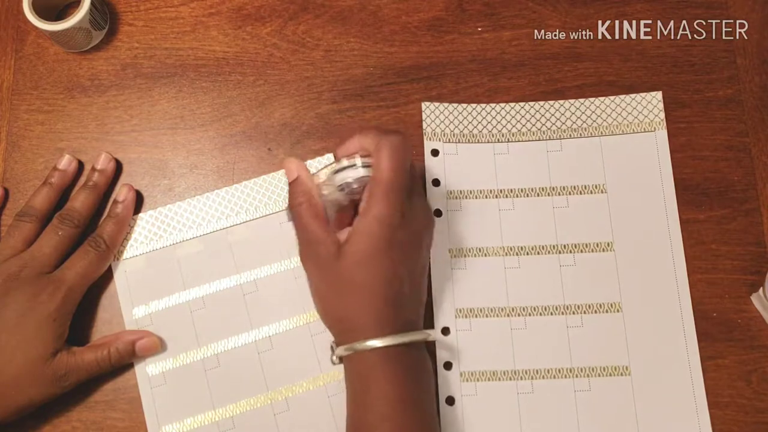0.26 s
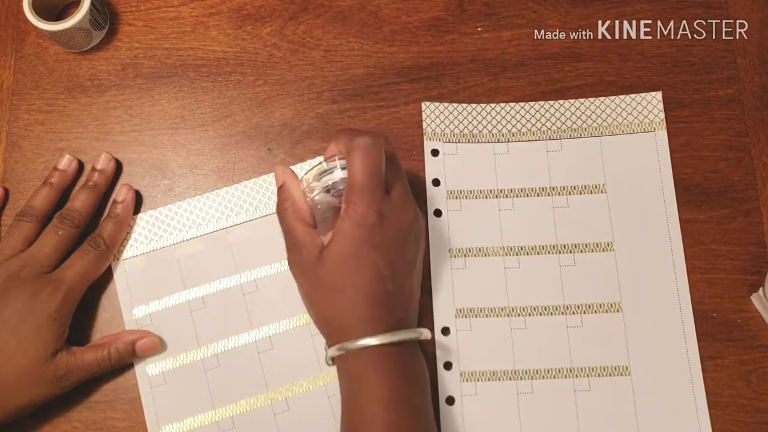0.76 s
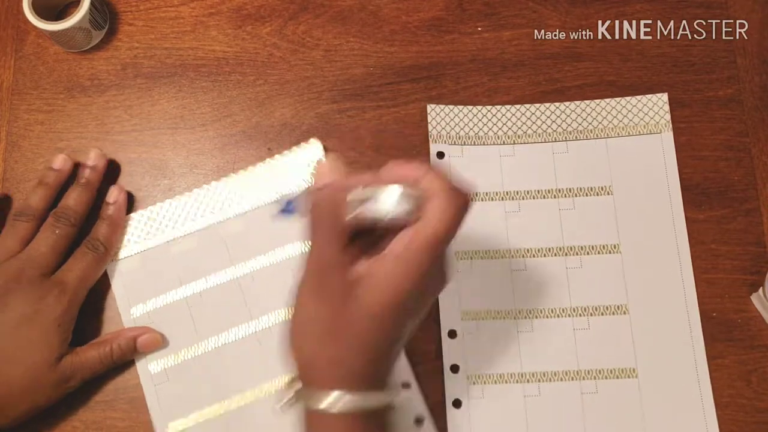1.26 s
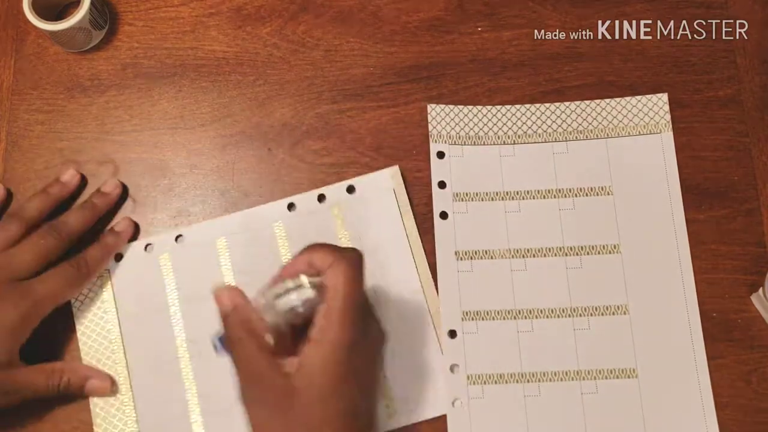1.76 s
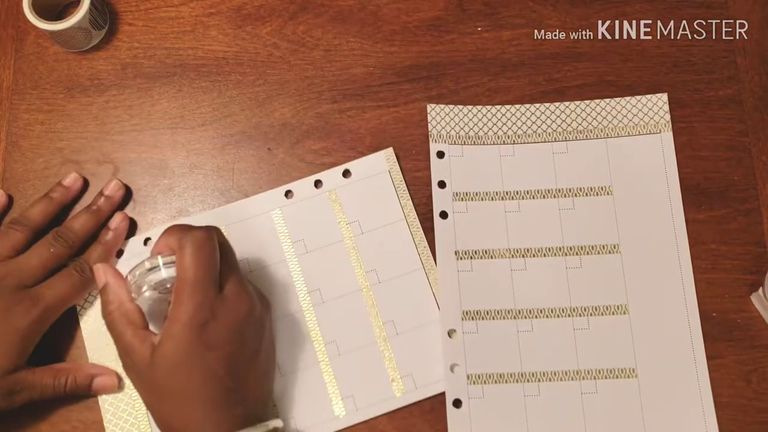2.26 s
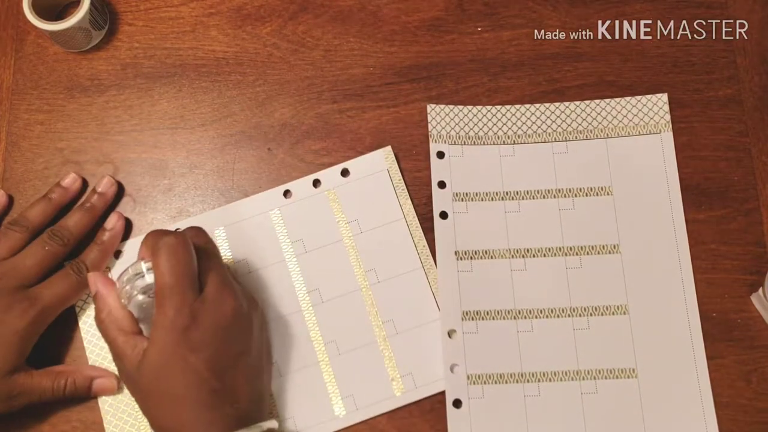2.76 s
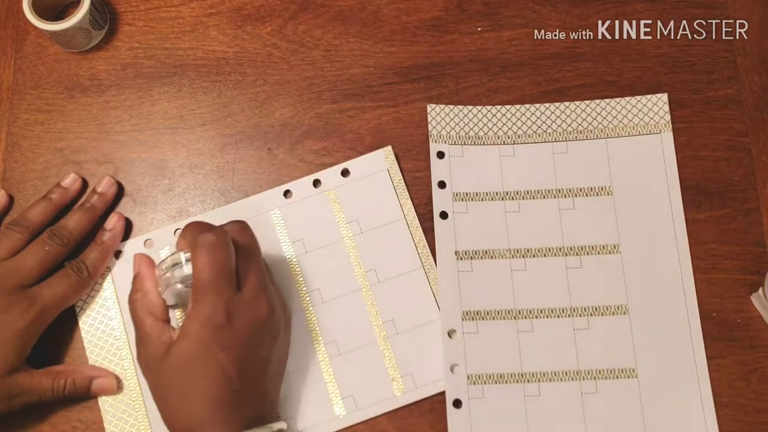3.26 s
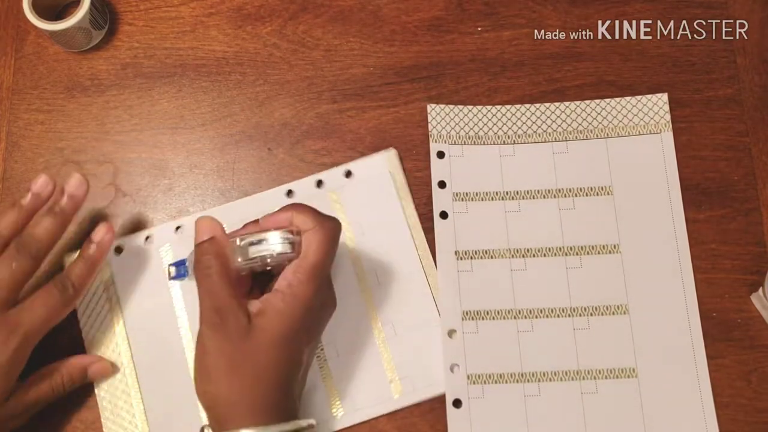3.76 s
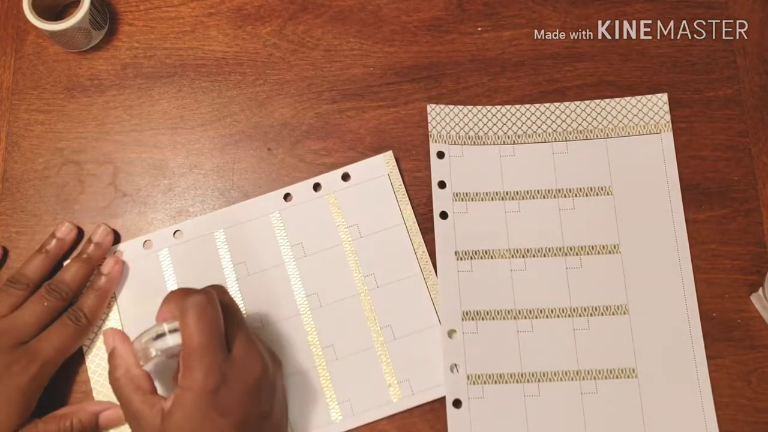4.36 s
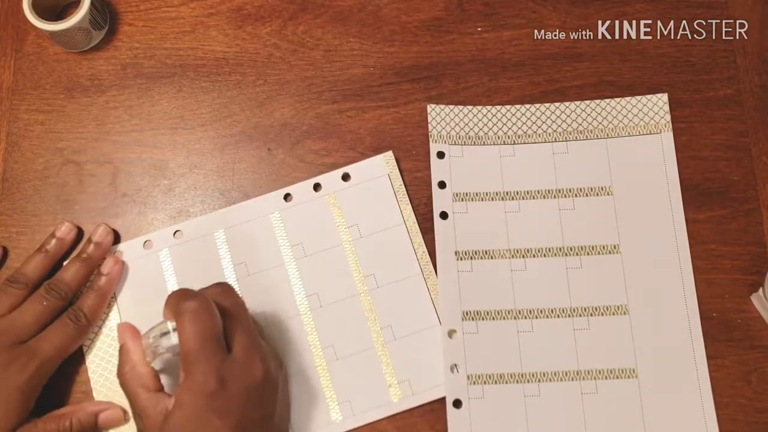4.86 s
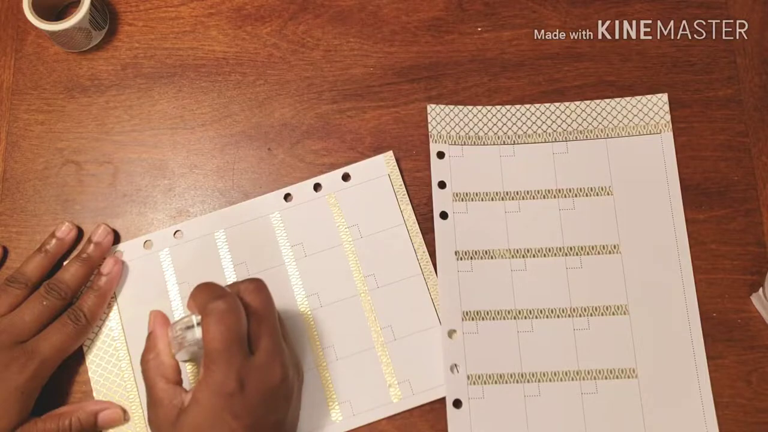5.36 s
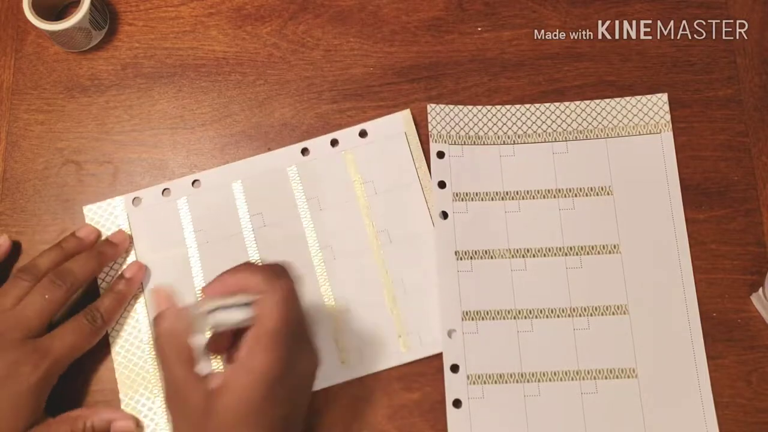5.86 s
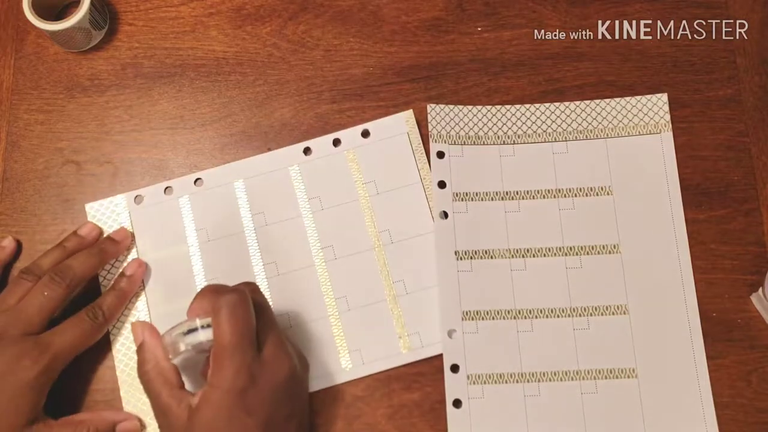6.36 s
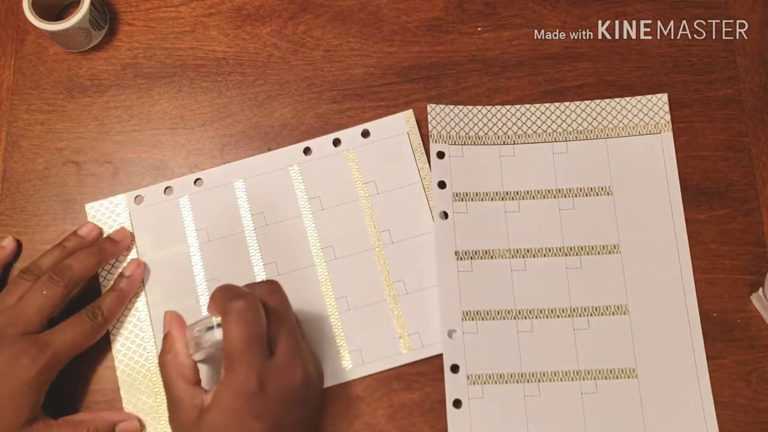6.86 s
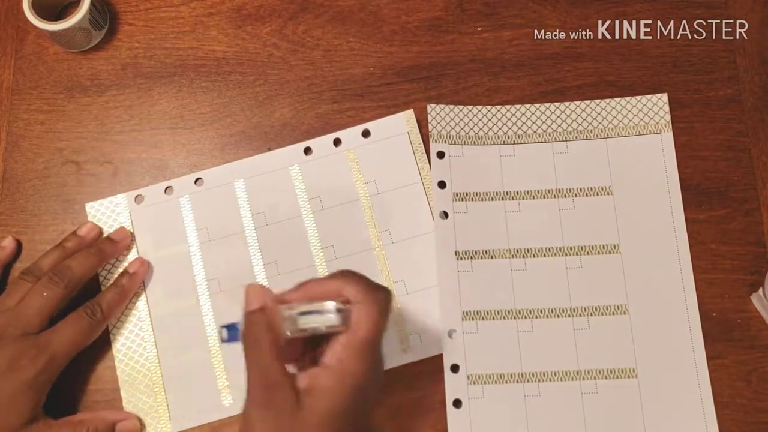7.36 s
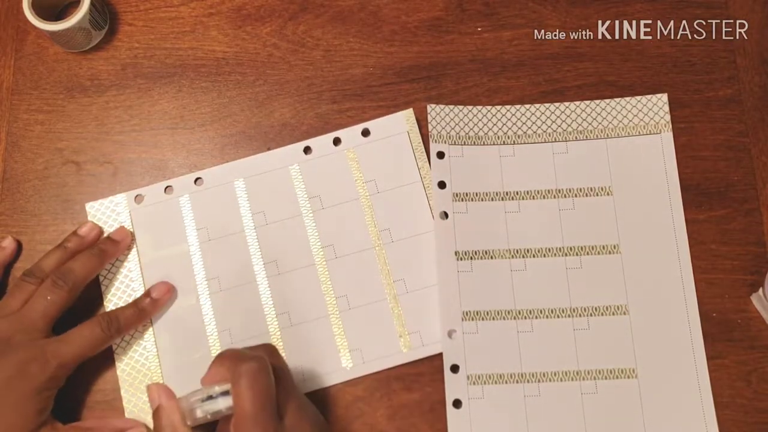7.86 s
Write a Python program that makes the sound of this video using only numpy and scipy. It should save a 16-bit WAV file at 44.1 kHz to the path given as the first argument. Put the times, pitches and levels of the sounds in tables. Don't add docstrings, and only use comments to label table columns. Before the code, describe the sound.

A correction-tape roller clicks in five dry ratcheting bursts over paper, with page scuffs, desk bumps and distant hollow knocks above a low hum.

```python
import sys
import numpy as np
from scipy import signal
from scipy.fft import rfft, irfft, next_fast_len
from scipy.io import wavfile
from scipy.ndimage import uniform_filter1d

SR = 44100
rng = np.random.default_rng(int(sys.argv[2]) if len(sys.argv) > 2 else 0)


def transcribe(u):
    v = np.clip(np.atleast_2d(u).T, -1, 1)
    q = np.round(v * 32767).astype(np.int16)
    wavfile.write(sys.argv[1], SR, q)


def volts(x):
    e = np.asarray(x, float) / 20
    return 10 ** e


N = 358091

# (start [s], end [s], whirr [Hz], whirr level [dB])
STROKES = [
    (0, 0.247, 2200, -92),
    (0.754, 1.147, 2190, -80.5),
    (2.819, 3.604, 3110, -74.5),
    (4.751, 5.548, 1980, -84),
    (6.686, 7.349, 2020, -93),
]
# (ringing at start [Hz], at end [Hz], rattle at start [dB], at end [dB])
GRIPS = [(7500, 5240, -0.5, -8), (7300, 7100, 0.5, -6.5), (6660, 8100, -3, -2.5), (7800, 7100, -0.5, -5.5),
         (7140, 7600, -3.5, -0.5)]
# (time [s], 138 Hz mode [dB], 68 Hz mode [dB], slap level [dB], slap pitch [Hz])
BUMPS = [(.19, -79, -48.5, -58.5, 370), (1.25, -51, -67, -60, 350), (1.305, -59, -57, -65, 300),
         (1.486, -53, -51, -42, 435), (1.768, -46.5, -43, -61, 280), (2.09, -71, -71, -63, 610),
         (3.69, -73, -61, -60.5, 305), (3.918, -44.5, -43, -67, 250), (4.87, -74, -70, -60, 260),
         (5.581, -75, -64, -62, 560), (5.889, -73, -49, -86, 300), (7.36, -59, -54, -55, 490),
         (7.562, -51, -68, -67, 302), (7.662, -60, -46, -63, 230)]


def level(x, db):
    return x * volts(db) / np.sqrt(np.mean(x ** 2))


def shape(table, hz):
    f, value = np.transpose(table)
    return np.interp(np.log(hz + 1), np.log(f), value)


def colour(x, table):
    n = next_fast_len(x.shape[-1], True)
    gain = volts(shape(table, np.fft.rfftfreq(n, 1 / SR)))
    return irfft(rfft(x, n) * gain, n)[..., :x.shape[-1]]


def ring(x, hz, width):
    return signal.lfilter(*signal.iirpeak(hz, hz / width, SR), x)


def fade(n, t60):
    return volts(-60 * np.arange(n) / SR / t60)


def diffuse(n):
    ports_m = 0.22
    m = next_fast_len(n, True)
    coherence = .985 * np.sinc(2 * np.fft.rfftfreq(m, 1 / SR) * ports_m / 343)
    mid, side = rfft(rng.standard_normal((2, m))) * np.sqrt([1 + coherence, 1 - coherence])
    return irfft(np.array([mid + side, mid - side]) / 2 ** .5, m)[:, :n]


def walk(rate):
    k = int(SR / rate)
    steps = np.repeat(rng.standard_normal(N // k + 1), k)
    return 1.284 * uniform_filter1d(uniform_filter1d(steps, k), k)[:N]


def add(track, s, sound):
    i = max(int(s * SR), 0)
    track[..., i:i + sound.shape[-1]] += sound[..., :N - i]


def tail(t60s, rise_s, size):
    noise, out = diffuse(size), 0
    for hz in 62.5 * 2 ** np.arange(9):
        octave = [(hz / 2, -80), (hz / 1.6, -9), (hz, 0), (hz * 1.6, -9), (hz * 2, -80)]
        out = out + colour(noise, octave) * fade(size, shape(t60s, hz))
    out = out * (1 - np.exp(-np.arange(size) / SR / rise_s))
    return out / np.sqrt(np.mean(np.sum(out ** 2, axis=1)))


def through(x, echoes):
    return signal.fftconvolve(np.broadcast_to(x, (2, N)), echoes, axes=1)[:, :N]


def alike(echoes):
    # (frequency [Hz], gain [dB])
    width = [(250, -22), (450, -1), (700, -1.5), (1100, -1.5), (1500, 0.5)]
    n = echoes.shape[1]
    pair = rfft([echoes[0] + echoes[1], colour(echoes[0] - echoes[1], width)]) / 2
    near, wide = (uniform_filter1d(np.abs(pair) ** 2, size=int(hz * n / SR)) for hz in (70, 700))
    mid, side = irfft(pair * np.sqrt(wide / near), n)[:, :3 * n // 4]
    return np.array([mid + side, mid - side])


def even(x):
    z = rfft(x)
    near, wide = (uniform_filter1d(np.abs(z) ** 2, size=k) for k in (3, 30))
    return irfft(z * (wide / near) ** .4, x.shape[-1])


def appliance():
    # (frequency [Hz], level [dB], wobble [dB], left leads by [rad])
    hum = [(80.4, -68.5, 2, .01), (121, -61.5, 0.36, 0.0075), (141.3, -80.5, 5.5, .01),
           (176.2, -69.5, 0.75, 0.012), (734.4, -79, 1.5, 0.89)]
    # (frequency [Hz], density [dB per Hz])
    air = [(20, -5), (45, -6.5), (65, 2.5), (95, -11), (150, -4), (240, -5), (300, -16), (500, -18),
           (620, -26.5), (800, -21.5), (1000, -32), (2000, -39.5), (6500, -39.5), (15300, -40.5),
           (15600, -39), (15900, -70)]
    t = np.arange(N) / SR
    lines = np.zeros((2, N))
    for hz, db, wobble_db, lead in hum:
        strength = 2 ** .5 * volts(db + wobble_db * walk(3.8))
        drift = .5 * np.cumsum(walk(4)) / SR * wobble_db * 6
        lines += strength * np.sin(2 * np.pi * hz * t + drift + [[lead], [0]])
    return lines + level(colour(diffuse(N), air), -60.5)


def ratchet():
    # (time [s], peak [dB], dull part [dB], bright part [dB])
    teeth = [(0.0064, -30.0, -14.5, -2.5), (0.066, -30.5, -16, -2.5), (0.1113, -31.5, -18, 1.5),
             (0.191, -31, -21.5, -3),
             (0.7756, -46, -14, 6), (0.8023, -33, -14.5, 5), (0.8186, -33.5, -15, 0),
               (0.8339, -32, -14, 2), (0.869, -34, -13.5, 1), (0.9012, -33.5, -12, 4),
               (0.9299, -35, -13, -1), (0.9602, -33, -15, 3), (1.0016, -37.5, -11, 5),
               (1.0662, -36, -13, 3), (1.108, -33.5, -13, 4.5),
             (2.8286, -45, -14, 2), (2.844, -37, -9, 1), (2.868, -33.5, -17, 1), (2.884, -38, 0, 0),
               (2.913, -36, -17, 2), (2.925, -33.5, -13, 4), (2.951, -31.5, -17, 2), (2.988, -33.5, -24, 5),
               (3.0209, -32.5, -19, 4), (3.051, -31.5, -18, 3), (3.086, -31, -16, 3),
               (3.0986, -30, -28, -3), (3.119, -31, -20, 7), (3.152, -31.5, -10, 0), (3.184, -29.5, -14, 6),
               (3.222, -30, -13, 6), (3.263, -28.5, -9, 4.5), (3.308, -32, -17.7, 1),
               (3.408, -31, -17, -1.5), (3.455, -29.5, -18, -1), (3.569, -34, -20, -4),
             (4.775, -37.5, -12, -3.5), (4.7999, -31.5, -12.5, 3.5), (4.8314, -33.5, -12.5, -0.5),
               (4.897, -33.9, -10.5, 2.5), (4.9196, -35.5, -10.5, 1), (4.9438, -32, -13, 3),
               (4.9797, -33.5, -11, -0.5), (5.013, -32, -5, 6), (5.041, -31.5, -10.5, 2),
               (5.066, -31.5, -15, 2.5), (5.119, -30, -18, 0), (5.165, -29, -18, 0),
               (5.2132, -30.5, -19, 4.5), (5.2518, -29.7, -25, -3), (5.311, -28, -10, 1),
               (5.354, -30.5, -21, -2.3), (5.3985, -29, -12, -2), (5.526, -34.5, -17, 4.5),
             (6.698, -35, -24, -5), (6.719, -31, -19, -2), (6.73, -31.5, -15, -3), (6.746, -30, -10, 5),
               (6.764, -30.5, -18, -2), (6.7872, -28.5, -18, 1), (6.81, -32, -14, -4),
               (6.8336, -29.5, -16, -1.5), (6.861, -33, -16, -4), (6.885, -30.5, -17, -7),
               (6.9117, -33, -17, -2), (6.9358, -34, -15, -2), (6.9664, -33.5, -17, 1),
               (7.003, -30, -11, 3.5), (7.0495, -33, -12, 2.5), (7.1397, -31.5, -17.5, 1.5),
               (7.187, -37.8, -10, 4.5), (7.2177, -33.5, -13.5, 1.5), (7.302, -39, -12.8, 2),
               (7.3171, -32.5, -11.5, 4)]
    # (time [s], peak [dB])
    catches = [(0.0177, -37), (0.0757, -33.5), (0.1232, -34), (0.1724, -58), (0.8779, -42), (0.909, -37),
               (0.9366, -38.5), (2.839, -54), (3.229, -37), (3.2695, -39), (3.4135, -40), (3.461, -58),
               (6.768, -43), (6.8145, -40), (6.838, -40), (1.0818, -39), (2.858, -37), (2.8929, -33.5),
               (2.9644, -33.5), (3.0, -32.5), (3.0317, -33), (3.0615, -33.5), (3.1274, -36), (3.157, -32),
               (3.191, -35.5), (3.3198, -34), (4.851, -47), (4.9245, -35.5), (4.994, -40), (5.028, -39),
               (5.0552, -45), (6.7505, -34), (6.7335, -34), (6.8645, -40), (6.9165, -41), (6.889, -41),
               (6.7919, -38), (6.9393, -36), (6.9752, -37.5), (7.017, -38), (7.0707, -38.5)]
    # (time [s], peak [dB])
    slips = [(3.259, -40), (5.0923, -39), (5.1475, -38.5), (5.202, -35.5), (5.2373, -35), (5.2893, -41),
             (5.3407, -36), (5.382, -34), (6.7148, -32.5)]
    catch_tone_db, slip_tone_db, scatter_db = (-13, 2.7), (-5.5, 6.3), (1, 2.2)
    rows = [(*row, *catch_tone_db) for row in catches] + [(*row, *slip_tone_db) for row in slips]
    rows = np.array(rows)
    rows[:, 2:] += rng.standard_normal((len(rows), 2)) * scatter_db
    return [*teeth, *rows]


def spool_rattles():
    tone = [(2500, 11.5), (3600, 2.0), (6000, 0.5), (14000, 4.5), (15400, 5.0), (15900, -22)]
    t60s = [(3000, 0.12), (8000, 0.036), (14000, 0.036)]
    answers = [colour(tail(t60s, 0.00028, size=4400), tone) for _ in range(7)]
    return [answer * [[1.22], [1.65]] for answer in answers]


def hold(snap, s, k):
    regrip = [.1, .95, 3.28, 5.0, 6.98]
    # (ringing before the shift [dB], after [dB],
    # gap near 9200 Hz before [dB], after [dB], gap near 5400 Hz [dB])
    damping = [(-3, -6, -4, -3, -3), (-7, 0, -5, -3, 7), (3, -7, 2.5, 0.5, -1), (-10, 2, -3, -4, -4),
               (-8, 6, -1.5, -8, -1.5)]
    ring_1, ring_2, gap_1, gap_2, low_gap_db = damping[k]
    shift = s - regrip[k]
    takes = [-0.025, 0.025]
    hz = np.interp(shift, takes, GRIPS[k][:2])
    ring_db = np.interp(shift, takes, (ring_1, ring_2))
    gap_db = np.interp(shift, takes, (gap_1, gap_2))
    snap = snap + volts(-6.5) * ring(snap, hz, 890) + volts(ring_db) * ring(snap, hz, 660)
    gaps = [(4800, 0), (5400, low_gap_db), (5800, 0), (8300, 0), (9200, gap_db), (10300, 0)]
    return colour(snap, gaps)


def snaps():
    # (frequency [Hz], density [dB per Hz])
    case = [(1060, -33.5), (1800, -38.5), (1960, -35), (2510, -35.5), (3020, -24), (3610, -9), (4420, -4),
            (5470, -5), (6170, -2), (6770, -2), (8700, -0.5), (11100, 5), (14800, 5), (15700, -3.5),
            (16500, -9)]
    # (time [s], peak [dB], dull part [dB], bright part [dB])
    creases = [(1.247, -50, -22, -10), (1.374, -55, -12, -7), (1.4096, -45, 1, -6), (1.4696, -32, 0, -1),
               (1.8096, -60, 15, -2), (1.899, -51.5, 9, 0), (3.6478, -53, -12, -7),
               (3.734, -42.5, -17, -16), (3.827, -52, -5, -9), (3.916, -54, -8.5, -19), (3.923, -57, 3, 2),
               (3.972, -52, 4, -3), (5.6213, -44.5, -34, -6), (5.6812, -46, 8, -2), (5.71, -49, 7, 18),
               (5.8192, -41.5, -2, -24), (7.4639, -49.5, -19.5, 12), (1.392, -56, 0.1, -3),
               (1.5515, -40.5, -8, 3), (1.731, -47, -14, 0.1), (1.771, -49.5, 5, -3), (3.591, -46, -7, 9),
               (3.953, -50, -13, 3), (5.827, -49, -3, -7), (7.563, -64, -6, 2)]
    # (left minus right at start [dB], at end [dB],
    # extra brightness at start [dB], at end [dB])
    leans = [(0.5, 1.5, 4, -2.3), (1, 0, -2.5, -1.8), (3.5, -3.5, -0.5, -1.5), (2, 0, -1.5, -0.5),
             (0, 1, 1, -0.35)]
    bare, shaking = np.zeros((2, 2, N))
    rattles = spool_rattles()
    t = np.arange(500) / SR - .003
    burst = np.clip(t / 0.0015, 0, 1) * np.exp(-(np.maximum(t, 0) / 0.0022) ** 2)
    burst += 0.74 * np.exp(-((t - 0.0008) / 0.00017) ** 2)
    burst += 0.038 * np.exp(-((t + 0.0007) / 0.0048) ** 2)
    for i, (s, db, dull_db, bright_db) in enumerate([*ratchet(), *creases]):
        rattle_db, pan_db = -90, 1.5
        stroke = next((k for k, row in enumerate(STROKES) if row[0] <= s <= row[1]), None)
        if stroke is not None:
            span = STROKES[stroke][:2]
            dull_db = dull_db + np.interp(s, span, (2, -0.5))
            bright_db = bright_db + np.interp(s, span, leans[stroke][2:])
            pan_db = np.interp(s, span, leans[stroke][:2])
            rattle_db = np.interp(s, span, GRIPS[stroke][2:])
        noise = rng.standard_normal((3, len(t)))
        shared = np.array([noise[0], np.roll(noise[0], shift=8)])
        snap = colour(even((0.76 * shared + 0.83 * noise[1:]) * burst), case)
        tone = [(2400, dull_db + 12.5), (3100, dull_db + 10), (4500, dull_db + 11.0),
                (5500, 0.01), (8500, 0.012), (10000, bright_db - 5.0)]
        snap = colour(snap, tone)
        if stroke is not None:
            snap = hold(snap, s, stroke)
        snap = snap / np.sqrt(np.max(uniform_filter1d(np.mean(snap ** 2, axis=0), size=50)))
        snap = snap * volts(db - 4.5 + np.array([[pan_db], [-pan_db]]) / 2)
        rattle = signal.fftconvolve(snap, rattles[i % len(rattles)], axes=1)
        add(bare, s - .003, snap)
        add(shaking, s - .0008, snap * volts(rattle_db))
        add(bare, s - .0008, rattle * volts(rattle_db - 6.5))
    return bare, shaking


def roller(shaking):
    jolts = level(np.convolve(np.abs(shaking[0]), np.hanning(500))[:N], 0)
    whirr = np.zeros((2, N))
    for start, end, hz, db in STROKES:
        n = int((end - start) * SR)
        speed = np.minimum(np.arange(n) / SR / 0.074, 1) * np.linspace(1, 0, n) ** 2.1
        add(whirr, start, speed * level(ring(ring(diffuse(n), hz, 320), hz, 580), db))
    whirr = whirr * (1.6 + jolts) * volts(3.3 * walk(110))
    edges = np.ravel([row[:2] for row in STROKES])
    turning = np.interp(np.arange(N) / SR, edges, np.tile([1, 0], len(STROKES)))
    drone = level(ring(diffuse(N), 327, 77), 0)
    return whirr + volts(-77.5) * jolts * turning * drone


def squeaks():
    # (start [s], end [s], pitch [Hz], level [dB])
    drags = [(2.02, 2.274, 3380, -85.5), (6.008, 6.143, 3380, -84), (7.003, 7.008, 2780, -57),
             (7.012, 7.033, 2770, -62.5), (1.296, 1.335, 2050, -73.5), (1.37, 1.406, 2290, -74),
             (1.599, 1.621, 3760, -60.5), (1.769, 1.828, 2170, -78), (3.205, 3.404, 1950, -83),
             (6.707, 6.81, 3070, -73), (6.821, 6.957, 2030, -72.5), (0.168, 0.243, 744, -72.5)]
    out, catching = np.zeros((2, N)), volts(4.5 * walk(130))
    for start, end, hz, db in drags:
        n = int((end - start) * SR)
        add(out, start, level(ring(ring(diffuse(n), hz, 300), hz, 400), db) * np.hanning(n) ** 0.15)
    return out * catching


def bumps():
    # (frequency [Hz], t60 [s])
    desk = [(138.5, 0.89), (67.8, 0.32)]
    low, slaps = np.zeros((2, N))
    t = np.arange(SR) / SR
    for s, *mode_db, slap_db, slap_hz in BUMPS:
        for (hz, t60), db in zip(desk, mode_db):
            mode = np.sin(2 * np.pi * hz * t) * fade(SR, t60) * np.minimum(t / 0.034, 1)
            add(low, s, volts(db) * mode)
        touch = np.clip(t[:4000] * slap_hz * 2.24, 0, 1)
        scuff = uniform_filter1d(0.25 * rng.standard_normal(4000), size=16) * fade(4000, 0.054)
        push = scuff - np.sin(np.pi * touch) ** 2
        slap = ring(push, slap_hz, 0.4 * slap_hz)
        slap = slap + volts(-6.0) * ring(push, 2.13 * slap_hz, 1.1 * slap_hz)
        add(slaps, s, volts(slap_db) * slap / np.max(np.abs(slap)))
    return low, slaps


def slides():
    # (start [s], length [s], level [dB], bright part [dB])
    scuffs = [(1.16, 0.23, -71.5, -1), (1.363, 0.11, -61, -3.5), (1.447, 0.17, -61, 3.5),
              (1.648, 0.16, -67, 0.5), (1.842, 0.081, -66.5, -8), (2.003, 0.12, -74.5, -5),
              (3.595, 0.11, -76, 5.5), (3.713, 0.15, -69, -6), (3.906, 0.055, -66.5, -2),
              (5.54, 0.1, -75, 3), (5.644, 0.071, -57.5, -6), (5.753, 0.053, -67.5, 0),
              (5.824, 0.056, -67.5, 2), (5.877, 0.029, -65, -9), (7.334, 0.12, -76, -5),
              (7.427, 0.062, -88, 9)]
    # (frequency [Hz], density [dB per Hz])
    page = [(760, -56), (1300, -16), (1950, -22.5), (2850, -9.5), (4560, -2), (5460, -8), (6680, -3),
            (8620, -3.5), (14500, -3.5), (15500, -8), (15900, -40)]
    attack_s, t60_s, rumble_db = 0.023, 0.17, -75
    thud_db, thud_t60_s = -2, .15
    t = np.arange(SR // 2) / SR
    grains = colour(diffuse(N) * volts(1.7 * walk(90) + 0.5 * walk(370)), page)
    dull = level(colour(grains, [(6500, 0), (8000, -6), (10000, -30), (12000, -60)]), 0)
    bright = level(colour(grains, [(5000, -60), (6500, -25), (8000, -6), (10000, 0)]), 0)
    rumble = level(ring(ring(diffuse(N), 330, 490), 330, 490), 0)
    low, high, desk = np.zeros((3, N))
    for s, length, db, bright_db in scuffs:
        drag = np.minimum(t / attack_s, 1) * volts(-60 * np.maximum(t - length, 0) / t60_s)
        add(low, s, volts(db) * drag)
        add(high, s, volts(db + bright_db) * drag)
        add(desk, s, volts(rumble_db) * drag)
    for s, *_, slap_db, _ in BUMPS:
        add(desk, s, volts(slap_db + thud_db) * fade(SR // 2, thud_t60_s))
    return low * dull + high * bright + desk * rumble


def cracks():
    # (time [s], peak [dB], pitch [Hz], t60 [s])
    folds = [
        (1.4693, -33.5, 4710, 0.0035),
        (1.469, -37, 3900, 0.0028),
        (1.47, -37, 5600, 0.003),
        (1.4785, -46, 4470, .008),
        (5.82, -39.5, 4560, .005),
        (5.904, -51, 3740, 0.013),
        (5.951, -64, 4200, .008),
        (6.898, -50, 4600, .02),
    ]
    out, t = np.zeros((2, N)), np.arange(1500) / SR
    for s, db, hz, t60 in folds:
        tone = np.sin(2 * np.pi * hz * t + [[0], [.5]])
        crack = tone + .25 * rng.standard_normal((2, len(t)))
        crack = crack * np.minimum(t / .0006, 1) ** 2 * fade(len(t), t60)
        add(out, s, volts(db) * crack / np.max(np.abs(crack)))
    return out


def knocks():
    # (time [s], peak [dB], strength near 1900 Hz [dB], 2750 Hz [dB], 3450 Hz [dB],
    # above 4400 Hz [dB])
    blows = [
        (4.178, -46.5, -4, -4, 1, 0.5),
        (4.259, -36, -1, -5, 4, 0),
        (6.2118, -39, 2.5, -1, -0.5, -0.5),
        (7.675, -30, 4.5, 3, 3.5, 7.5),
    ]
    # (strength near 250 Hz [dB], 830 Hz [dB], 970 Hz [dB], room [dB])
    lows = [(3, 2, 0, -1), (-2.5, 0.47, 2.9, -5.5), (-1, 1.4, 3, -1.5), (-1, -1, 0.69, -0.5)]
    # (frequency [Hz], half width [Hz], level [dB])
    hollow = [(210, 29, -4.5), (250, 16, -2), (332, 44, -12.5), (560, 45, -19.5), (711, 51, -8.5),
              (831, 46, -1.5), (974, 28, 4.5), (1086, 105, -4.5), (1310, 70, -6), (1810, 45, -3),
              (1960, 47, -7.5), (2110, 46, -5.5), (2550, 83, -15), (2737, 60, -7.5), (3000, 90, -24.5),
              (3233, 39, -10), (3416, 83, -10), (3740, 110, -12), (4100, 58, -18.5), (4270, 110, -19),
              (4540, 99, -19.5), (5020, 190, -28), (7400, 420, -32), (12100, 3000, -62)]
    out, spread = np.zeros((2, N))
    hz = np.fft.rfftfreq(8192, 1 / SR)
    modes = sum(volts(2 * g) * np.exp(-((hz - f) / w) ** 2) for f, w, g in hollow)
    power = modes + volts(-52) / (1 + (hz / 4500) ** 4)
    for (s, db, *high_db), (*low_db, room_db) in zip(blows, lows):
        favour = [*zip((250, 830, 970), low_db), (1300, 0), *zip((1900, 2750, 3450, 4400), high_db)]
        cepstrum = irfft(np.log(power * volts(2 * shape(favour, hz))) / 2)
        cepstrum[1:len(hz) - 1] *= 2
        cepstrum[len(hz):] = 0
        body = irfft(np.exp(rfft(cepstrum)))
        body = body / np.max(np.abs(body))
        add(out, s, volts(db) * body)
        add(spread, s, volts(db + room_db) * body)
    return out, spread


def flutter(far):
    step_s, start_db, loss_db = 0.034, -1, -9
    treble = colour(far, [(2500, -39), (3600, 0), (4600, 0.1), (5600, -25), (9000, -40)])
    out = np.zeros(N)
    for k in range(1, 5):
        add(out, k * step_s, volts(start_db + k * loss_db) * treble)
    return through(out, tail([(500, .02), (5000, .015)], .0005, size=1500))


def first_echoes(far):
    first = through(far, alike(tail([(500, 0.065), (5000, 0.025)], .0045, size=5000)))
    add(first, 0.0057, volts(-18.5) * far * [[1.2], [.8]])
    return colour(first, [(300, -4.5), (600, -0.5)])


def scene():
    # (frequency [Hz], t60 [s])
    room_t60 = [(500, 0.5), (4000, 0.37), (12000, 0.26)]
    # (frequency [Hz], gain [dB])
    tails_top = [(15300, 0), (15600, -1), (15900, -39)]
    # (frequency [Hz], gain [dB])
    thump = [(150, 10), (300, 3), (450, -14), (700, -40)]
    bare, shaking = snaps()
    near = bare + roller(shaking) + slides() + squeaks() + cracks()
    low, slaps = bumps()
    far, spread = knocks()
    room = colour(alike(tail(room_t60, 0.003, size=30000)), tails_top)
    sent = volts(-9.0) * near + volts(-0.5) * slaps
    sent = sent + volts(13.0) * colour(spread, [(300, -0.5), (600, 0.5)])
    distant = volts(1.0) * far + colour(far, thump) + volts(8.0) * first_echoes(far) + flutter(far)
    return near + through(sent, room) + distant + slaps + low + appliance()


def low_pass(x):
    return signal.sosfilt(signal.butter(12, 16640, fs=SR, output="sos"), x)


def record(dry):
    # (frequency [Hz], gain [dB])
    mics = [
        [(1000, 4.5), (12000, 2.5), (15400, 3.5), (15900, -5), (16550, -18), (16700, -90)],
        [(1000, 4), (12000, 1), (15400, -1.5), (15900, -14), (16550, -16), (16700, -90)],
    ]
    mix = np.array([colour(x, mic) for x, mic in zip(dry, mics)])
    return low_pass(mix)


dry = scene()
out = record(dry)
transcribe(out)
```